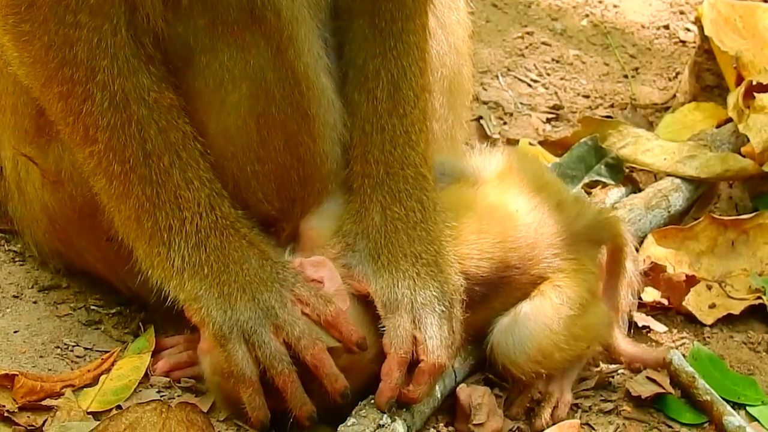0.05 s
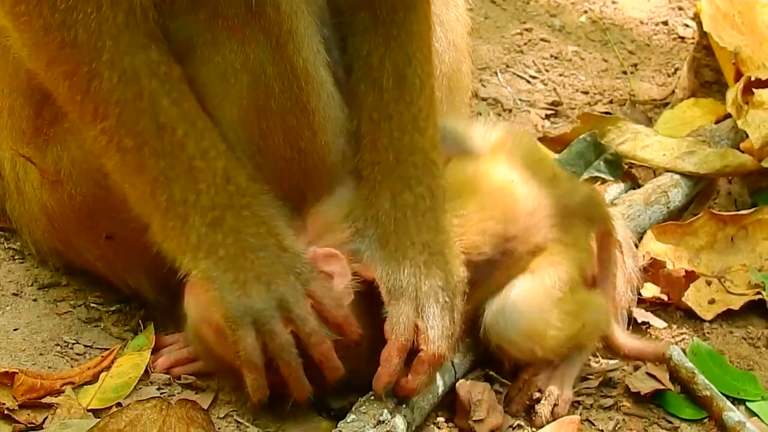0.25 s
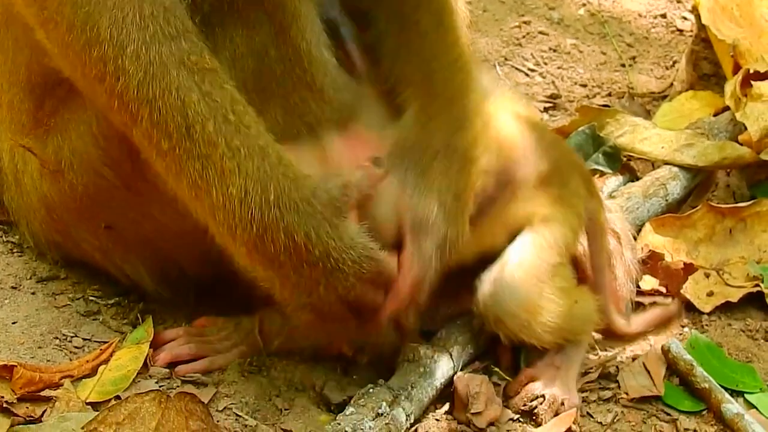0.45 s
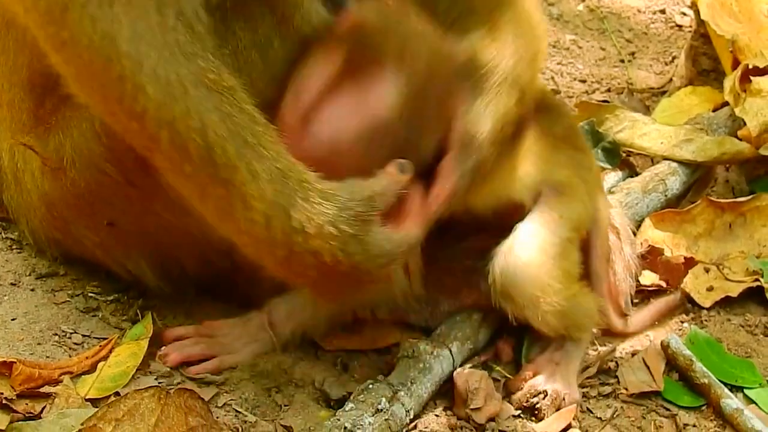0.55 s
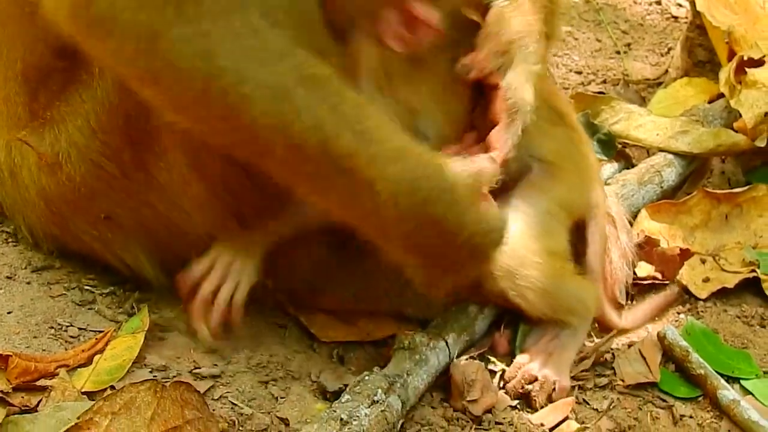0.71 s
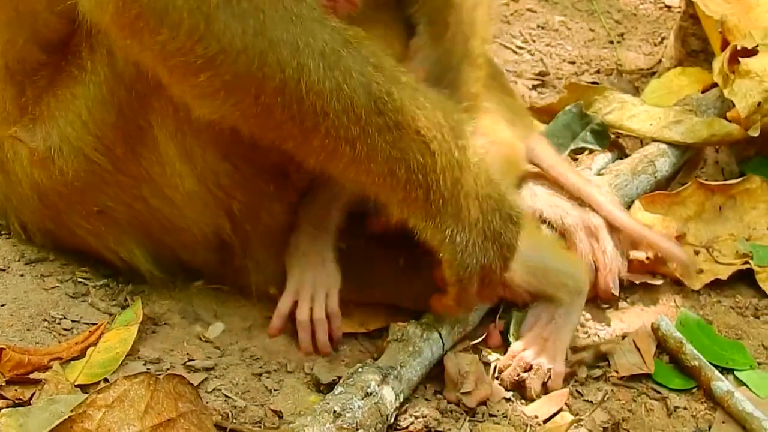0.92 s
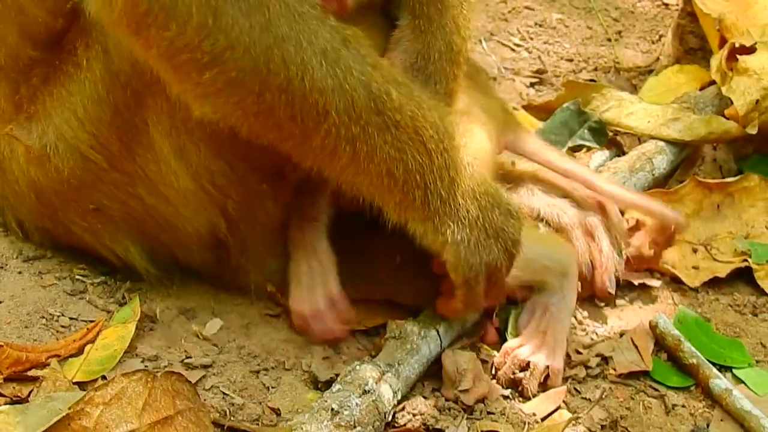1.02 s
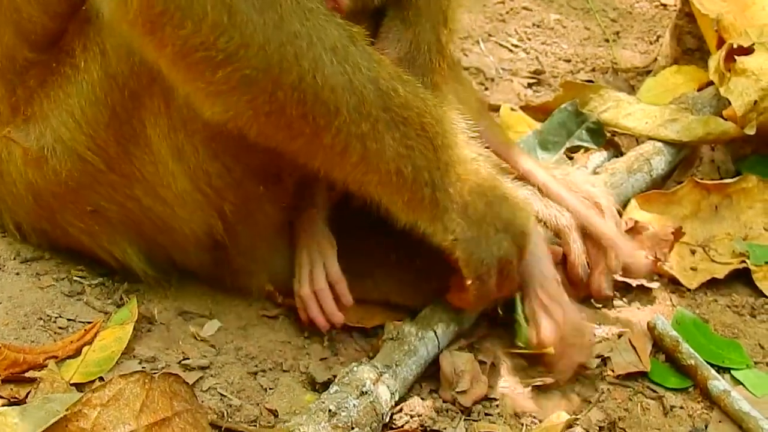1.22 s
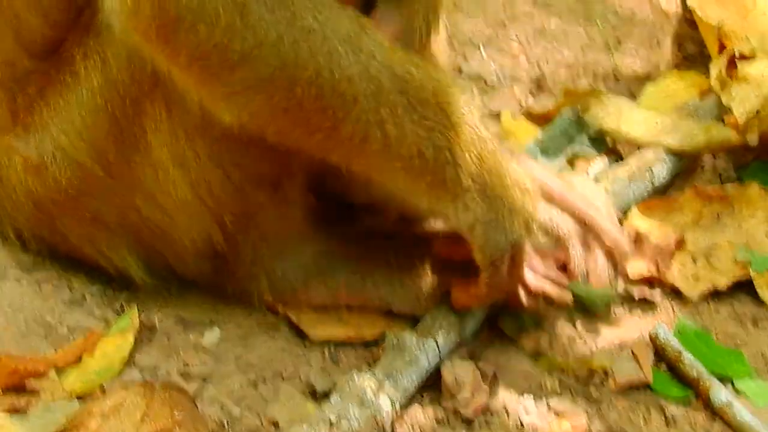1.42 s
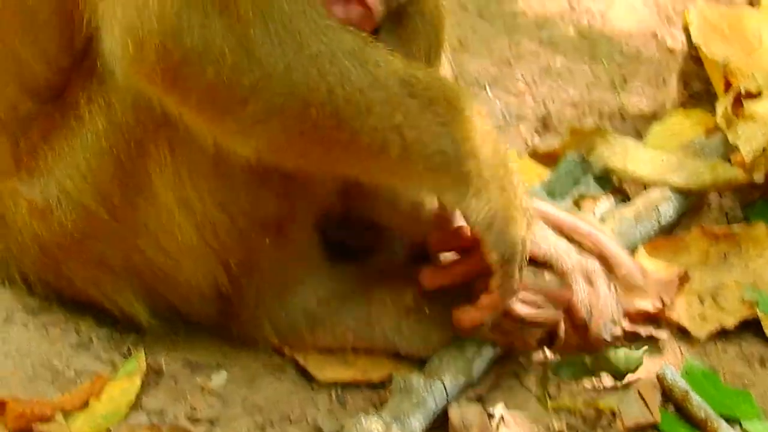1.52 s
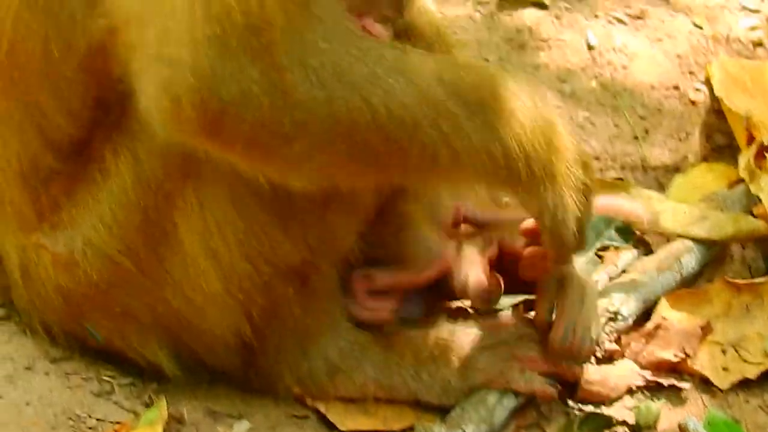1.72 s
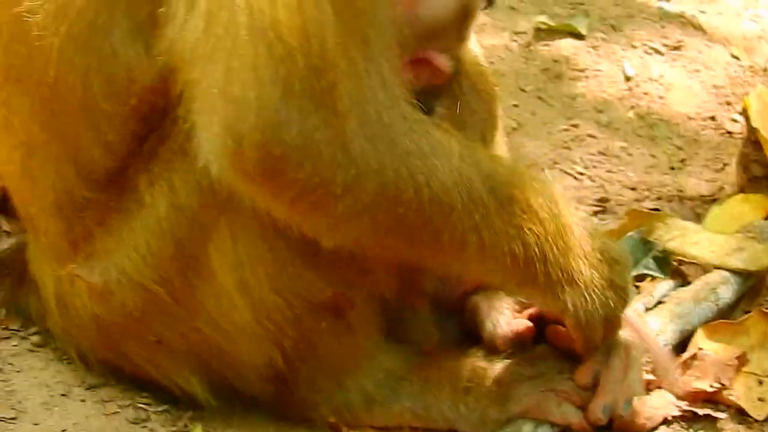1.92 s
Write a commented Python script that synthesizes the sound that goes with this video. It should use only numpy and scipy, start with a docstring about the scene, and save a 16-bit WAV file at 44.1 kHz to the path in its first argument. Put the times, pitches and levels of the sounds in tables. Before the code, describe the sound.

A baby monkey close by yelps hoarsely, rising into thin shrill squeals, amid light leaf scuffles outdoors

```python
"""Over a steady low rumble and a high insect hiss, limbs scuffle on dry ground and leaves snap: shaped noise.
A baby macaque, held down on the leaves, cries close by: hoarse yelps that climb in pitch and force, made of
unsteady pulses and air ringing a throat resonance, with rasps of bright noise where the voice breaks.
Thin arched squeals then join and outlast the yelps: frequency-modulated tones with weak partials.
The forest answers throughout with a faint echo: convolution with decaying noise."""
import sys
import numpy as np
from scipy import signal
from scipy.fft import rfft, irfft
from scipy.io import wavfile

SR = 44100
rng = np.random.default_rng(int(sys.argv[2]) if len(sys.argv) > 2 else 0)


def master_out(mix):
    """Clip the mix to full scale and print it as 16-bit PCM to the path in sys.argv[1]."""
    frames = np.transpose(np.atleast_2d(mix))
    ceiling = np.clip(frames, -1, 1)
    pcm = np.round(ceiling * 32767).astype(np.int16)
    wavfile.write(sys.argv[1], SR, pcm)


N = 85995  # samples


def undb(db):
    """Decibels to amplitude ratio: 20 dB for each factor of ten."""
    return 10 ** (np.asarray(db) / 20)


def unit(x):
    """Normalisation to an rms of 1."""
    return x / np.sqrt(np.mean(x ** 2))


def times():
    """Uniform sampling: the time of every sample [s]."""
    return np.arange(N) / SR


def noise():
    """White Gaussian noise, uncorrelated between left and right."""
    return rng.standard_normal((2, N))


def freqs():
    """Discrete spectrum: the frequency of every bin [Hz], at least 1 to keep logarithms finite."""
    return np.maximum(np.arange(N // 2 + 1) * SR / N, 1)


def band(x, hz, width_hz):
    """Steep zero-phase resonance: half power at the edges of its width."""
    f = freqs()
    detuning = (f * f - hz * hz) / (f * width_hz)
    return irfft(rfft(x) / np.sqrt(1 + detuning ** 6), N)


def colour(x, points):
    """Linear filtering: gain [dB] interpolated over logarithmic frequency."""
    hz, db = np.array(points).T
    gain = undb(np.interp(np.log(freqs()), np.log(hz), db))
    return irfft(rfft(x) * gain, N)


def wobble(rate_hz):
    """Slow random modulation: low-passed noise of rms 1, separate for each side."""
    return unit(irfft(rfft(noise()) * np.exp(-(freqs() / rate_hz) ** 2), N))


def envelope(start, hold, fade):
    """Transient energy: linear attack, then exponential decay once the hold has passed."""
    attack_s = 0.004
    t = times() - start
    return np.clip(t / attack_s, 0, 1) * np.exp(-np.maximum(t - hold, 0) / fade)


def pan(db):
    """Interaural level difference: gains that set the left side db above the right."""
    return unit(undb(np.array([[db], [-db]]) / 2))


def yelps():
    """Source-filter voice: jittered pulses and pulsating air excite throat and chest resonances."""
    # Yelps: (start [s], hold [s], fade time constant [s], pitch [Hz], throat resonance [Hz],
    # throat width [Hz], throat level [dB], chest level [dB], roughness [0-1], left over right [dB])
    yelp_rows = [(0.103, 0.019, 0.015, 601.5, 2240, 900, -39.5, -56.5, 0.87, -13),
                 (.212, 0.0065, 0.02, 531, 1544, 780, -30, -49.5, 0.75, -12),
                 (.275, 0.011, 0.004, 680, 1910, 500, -27, -38.5, 0.59, -3),
                 (0.451, 0.034, 0.0075, 620, 1840, 930, -20.5, -36.5, 0.92, 16.5),
                 (0.468, 0.015, 0.014, 452.6, 1510, 643, -18.5, -24.5, 0.3, -1.5),
                 (.637, .022, 0.0089, 689.7, 2263, 740, -14.5, -38, 0.62, 2),
                 (.816, 0.03, 0.051, 883, 3180, 1094, -16.5, -56.5, 0.74, 0.5),
                 (0.917, 0.019, .014, 1000, 2960, 1010, -15, -66, 0.69, 0)]
    jitter, jitter_rate_hz = 0.09, 500  # relative pitch spread at full roughness
    sag_per_s = 0.53  # relative fall of pitch
    air_share = 0.91  # air at full roughness, against pulses of rms 1
    chest_hz, chest_width_hz = 462, 315
    out, t = 0, times()
    for start, hold, fade, hz, throat_hz, width, db, chest_db, rough, side in yelp_rows:
        unrest = jitter * rough * wobble(jitter_rate_hz)
        sag = sag_per_s * np.clip(t - start - hold, -hold, hold)
        pitch = hz * (1 + unrest - sag)
        cycle = np.cumsum(pitch, axis=1) / SR % 1
        pulses = unit(np.diff(cycle, prepend=0))
        # air is strongest just after each pulse
        air = air_share * rough * noise() * unit(1 - cycle)
        source = pulses + air
        throat = undb(db) * unit(band(source, throat_hz, width))
        chest = undb(chest_db) * unit(band(source, chest_hz, chest_width_hz))
        out = out + (throat + chest) * envelope(start, hold, fade) * pan(side)
    return out


def rasps():
    """Turbulence in a broken voice: randomly modulated noise filtered by the open mouth."""
    # Rasps: (start [s], hold [s], fade time constant [s], lower edge [Hz], level [dB], left over right [dB])
    rasp_rows = [(0.119, 0.012, 0.04, 2800, -31.5, -3.5), (0.227, 0.022, 0.021, 3600, -24.5, -3.5),
                 (.286, 0.0079, 0.0037, 3700, -27.5, 2.5), (0.463, 0.016, 0.016, 3700, -18, -0.5),
                 (0.643, .032, 0.0049, 3000, -18.5, 0.5), (0.814, 0.025, 0.046, 3200, -17, 0),
                 (0.928, .024, 0.016, 3500, -37, -2)]
    # Response of the open mouth: (frequency [Hz], relative gain [dB])
    mouth = [(300, -14.5), (1500, -4), (2600, 1), (3400, -1.5), (4400, 5), (5400, -2.5), (6200, -11),
             (8000, -29.5), (9800, -48), (15000, -47.5)]
    burst_rate_hz, burst_depth_db = 490, 4
    out = 0
    for start, hold, fade, edge_hz, db, side in rasp_rows:
        turbulence = noise() * undb(burst_depth_db * wobble(burst_rate_hz))
        voiced = colour(turbulence, mouth)
        high_pass = signal.butter(3, edge_hz, "high", fs=SR, output="sos")
        bright = unit(signal.sosfilt(high_pass, voiced))
        out = out + undb(db) * bright * envelope(start, hold, fade) * pan(side)
    return out


def squeals():
    """Frequency modulation: a gliding tone with upper partials, subharmonic lines and a skirt of air."""
    # Squeals, one curve each: (time [s], pitch [Hz], level [dB], octave level [dB], roughness [0-1])
    curves = [
        [(.623, 2764, -48, -70, 0.09), (.635, 2697, -34, -67, 0), (.638, 2737, -16, -45, 0.02),
         (.655, 2739, -22.5, -38, 0.14), (.664, 2660, -35, -46.5, 0.62)],
        [(.803, 2700, -48, -63, 0.32), (.814, 2700, -23.5, -60, 0.31), (.818, 2697, -17, -38, 0.3),
         (.827, 2686, -11.5, -43, 0.54), (.836, 2690, -25.5, -50.5, .7)],
        [(.8165, 4500, -25, -31.5, .2), (.820, 4343, -10.5, -40.5, 0), (.827, 4380, -15.5, -41.5, 0.42),
         (.832, 4040, -25, -44.5, 1)],
        [(.895, 3288, -19, -8.5, .1), (.900, 3646, -19, -33, .1), (.903, 3856, -6, -28, 0.15),
         (.908, 4402, -32, -39, .4), (.916, 4156, -7, -47, 0.14), (.928, 3895, -17, -49, 0.07),
         (.955, 4060, -26, -64.5, 0.76)],
        [(1.118, 4170, -21, -44, 0.14), (1.125, 4540, -29, -44, 0.3), (1.131, 4573, -21, -48.5, 0.19),
         (1.150, 4990, -21.5, -41, 0.08), (1.163, 5123, -18.5, -42, 0.19), (1.171, 5010, -20.5, -49.5, 0)],
        [(1.166, 4200, -20, -39, 0.25), (1.182, 4050, -21.5, -35, 0.42), (1.195, 3520, -32.5, -39.5, 0.6),
         (1.206, 3240, -35, -43, 0.4)],
        [(1.231, 4426, -26.5, -40.5, 0.22), (1.242, 4280, -23, -34, 0.25), (1.255, 4470, -22.5, -36.5, 0),
         (1.264, 4284, -21, -31.5, 0.04), (1.272, 3420, -30, -27, 0.28), (1.285, 3297, -25, -32.5, .15),
         (1.305, 3317, -30.5, -39, 0), (1.317, 3404, -45, -44.5, 0.17)],
        [(1.327, 4195, -22, -25, 0.13), (1.336, 4490, -16.5, -34.5, 0), (1.340, 4810, -23, -49, 0.09),
         (1.344, 5070, -16, -48, 0.13), (1.355, 4733, -8, -40, .06), (1.371, 4569, -12, -41, 0.13),
         (1.378, 4300, -12.5, -31, 0.65), (1.386, 3744, -29, -43, 0.62), (1.396, 3290, -25, -26.5, 0.64)],
    ]
    # One row for each squeal: (left over right [dB], lag of the left side [s],
    # half-pitch lines relative to the tone [dB])
    traits = [(0, -0.0022, -43), (-1.5, -0.0054, -45), (5, 0.0014, -35), (-4, .009, -32.5),
              (1.5, -0.001, -19.5), (-2.5, .0005, -47), (1, 0.0011, -30.5), (-1, -.003, -48)]
    edge_s = 0.0027
    jitter, jitter_hz = 0.0812, 870  # relative pitch spread of the shared unrest at full roughness
    own_jitter = 0.4546  # unrest separate for each side, relative to the shared unrest
    flutter_hz, flutter_db = 330, 1.3
    third_db = -30  # third partial relative to the octave
    air_db, air_hz = -14, 1410  # skirt relative to the tone at full roughness, and its reach
    octave_blur = 0.54  # phase unrest of the upper partials [rad]
    out, t = 0, times()
    for curve, (side, lag, half_db) in zip(curves, traits):
        at, *columns = np.array(curve).T
        heard = np.array([t - lag, t])
        hz, db, octave_db, rough = (np.interp(heard, at, column) for column in columns)
        unrest = wobble(jitter_hz)[0] + own_jitter * wobble(jitter_hz)
        pitch = hz * (1 + jitter * rough * unrest)
        phase = 2 * np.pi * np.cumsum(pitch, axis=1) / SR
        halves = undb(half_db) * (np.sin(phase / 2) + np.sin(phase + phase / 2) / 2)
        # two random quadrature components spread noise around the tone
        skirt = wobble(air_hz) * np.sin(phase) + wobble(air_hz) * np.cos(phase)
        air = undb(air_db) * np.sqrt(np.abs(rough)) * skirt
        octave = 2 * phase + octave_blur * wobble(jitter_hz)
        upper = np.sin(octave) + undb(third_db) * np.sin(phase + octave)
        gate = np.clip(np.minimum(heard - at[0], at[-1] - heard) / edge_s, 0, 1)
        # the root of 2 gives a sine an rms of 1
        tone = np.sqrt(2) * (undb(db) * (np.sin(phase) + halves + air) + undb(octave_db) * upper)
        flutter = undb(flutter_db * wobble(flutter_hz))
        out = out + tone * gate * flutter * pan(side)
    return out


def ground(grain_db=3, grain_hz=600):
    """Friction and fracture: limbs scrape and thump as grainy noise bands, leaves snap as brief decays."""
    # Scuffles: (start [s], hold [s], fade time constant [s], centre [Hz], width [Hz], level [dB])
    scuffles = [(0.031, 0.03, 0.013, 150, 760, -37.5), (0.018, .07, 0.15, 3860, 3100, -39.5),
                (.287, 0.014, 0.0026, 262, 114, -26), (.287, 0.016, 0.0027, 580, 400, -34),
                (1.11, 0.018, 0.0087, 187, 39, -40.5), (1.115, 0.014, 0.013, 1900, 2200, -38.5),
                (.113, .03, 0.025, 730, 1700, -41), (1.427, 0.014, 0.027, 203, 170, -33),
                (1.441, 0.015, 0.043, 2540, 1200, -35.5), (1.455, 0.011, 0.014, 3930, 2800, -30.5),
                (1.448, 0.0084, 0.017, 1050, 1100, -41), (1.772, 0.019, 0.0068, 630, 700, -41),
                (1.834, 0.0096, 0.0027, 1000, 1400, -37.5), (1.842, 0.013, 0.014, 3500, 2400, -41.5)]
    # Dry leaves snapping: (time [s], level [dB])
    snaps = [(.129, -21.5), (.2375, -34.5), (.243, -39), (.253, -20), (.290, -34)]
    snap_hz, snap_width_hz, snap_fade_s = 4400, 1300, 0.00069
    litter_top_hz = 7200
    out, t = 0, times()
    for start, hold, fade, hz, width, db in scuffles:
        grains = noise() * undb(grain_db * wobble(grain_hz))
        out = out + undb(db) * unit(band(grains, hz, width)) * envelope(start, hold, fade)
    cracks = 0
    for at, db in snaps:
        cracks = cracks + undb(db) * (t >= at) * np.exp(-np.abs(t - at) / snap_fade_s)
    out = out + cracks * unit(band(noise(), snap_hz, snap_width_hz))
    low_pass = signal.butter(4, litter_top_hz, fs=SR, output="sos")
    return signal.sosfilt(low_pass, out)


def scatter(delay, fade):
    """Diffuse reflection: a decaying noise response of unit energy after a delay."""
    t = times()
    decay = (t > delay) * np.exp(-np.abs(t - delay) / fade)
    return unit(noise() * decay) / np.sqrt(N)


def surroundings(x):
    """Convolution with a room response: close scatter, one smeared echo and the faint tail of the trees."""
    # Colour of echo and tail: (frequency [Hz], gain [dB])
    forest_colour = [(200, -7.5), (1500, -17), (2800, -2), (4700, 1), (6200, 4), (10000, -2)]
    near_db, near_fade_s = -7.5, 0.015  # scatter from the ground and bodies
    echo_db, echo_s, echo_fade_s = -21, 0.039, 0.0066  # a nearby surface, level before colouring
    forest_db, forest_t60_s = -17.5, 0.57  # level before colouring, time to fall by 60 dB
    echo = undb(echo_db) * scatter(echo_s, echo_fade_s)
    trees = undb(forest_db) * scatter(0.01, forest_t60_s / np.log(1000))
    near = undb(near_db) * scatter(0.002, near_fade_s)
    response = near + colour(echo + trees, forest_colour)
    return x + signal.fftconvolve(x, response[:, :N // 2], axes=1)[:, :N]


def background():
    """Stationary filtered noise: low rumble, soft air and narrow bands of distant insect hiss."""
    # Rumble spectrum: (frequency [Hz], relative density [dB per Hz])
    rumble_colour = [(20, -2.5), (33, -4.5), (48, -1), (75, -0.5), (125, -3), (180, -12), (260, -21.5),
                     (500, -54)]
    # Insect bands: (centre [Hz], width [Hz], level [dB])
    hiss_bands = [(4440, 290, -52.5), (5443, 450, -52)]
    # Air spectrum: (frequency [Hz], relative density [dB per Hz])
    air_colour = [(150, -25), (250, -6), (385, -9.5), (658, -9), (1360, -15), (1530, -12.5), (2130, -19),
                  (2360, -15.5), (3010, -18.5), (3330, -13), (4550, -17), (4960, -11), (5410, -10),
                  (5790, -24.5), (8040, -28), (9070, -36), (15500, -48.5)]
    rumble_db, rumble_side = -38.5, 0.84  # side signal relative to the mid signal
    air_db = -45
    mid, side = colour(noise(), rumble_colour)
    stereo = np.array([mid + rumble_side * side, mid - rumble_side * side])
    rumble = undb(rumble_db) * unit(stereo)
    hiss = sum(undb(db) * unit(band(noise(), hz, width)) for hz, width, db in hiss_bands)
    air = undb(air_db) * unit(colour(noise(), air_colour))
    return rumble + hiss + air


def scene():
    """Superposition: voice and scuffle reflected by the forest, over the background."""
    sources = yelps() + rasps() + squeals() + ground()
    return surroundings(sources) + background()


def record(dry):
    """Hard limiting, then low-pass filtering: peaks clip, the treble is shaped and the top is cut."""
    # Treble response: (frequency [Hz], gain [dB])
    treble = [(8800, 0), (10800, -5), (15000, -2)]
    overload, top_hz = 0.9, 15760  # clipping amplitude, top of the passband
    clipped = np.clip(dry, -overload, overload)
    dull = colour(clipped, treble)
    # 0.2 dB passband ripple, 80 dB stopband attenuation
    low_pass = signal.ellip(10, 0.2, 80, top_hz, fs=SR, output="sos")
    return signal.sosfilt(low_pass, dull)


dry = scene()
out = record(dry)
master_out(out)
```